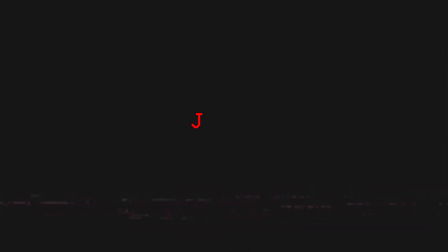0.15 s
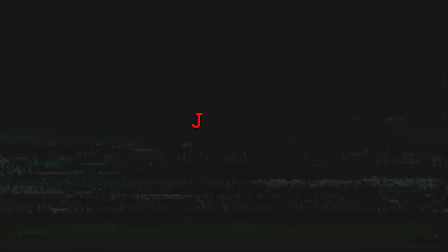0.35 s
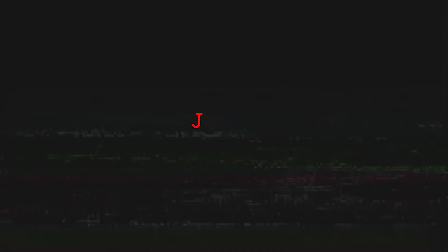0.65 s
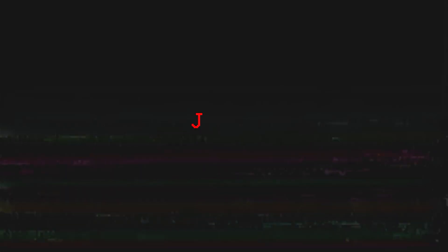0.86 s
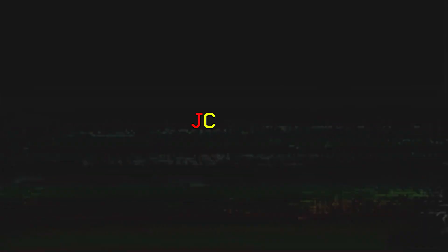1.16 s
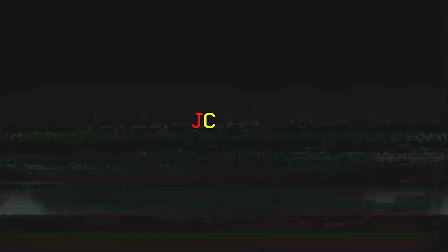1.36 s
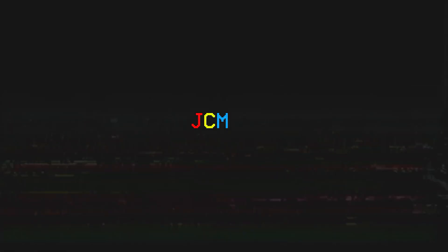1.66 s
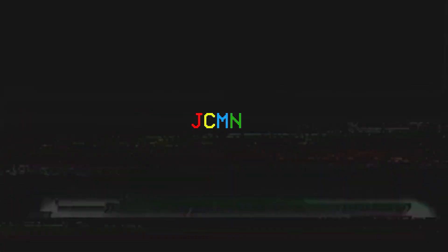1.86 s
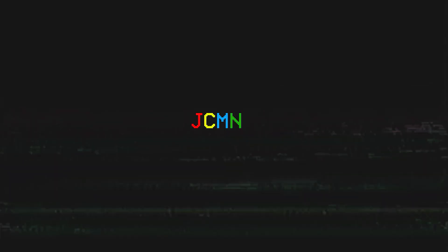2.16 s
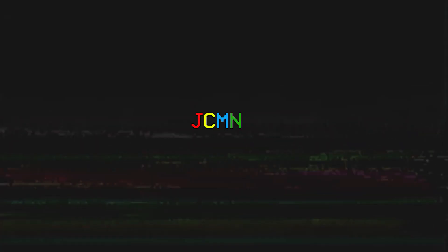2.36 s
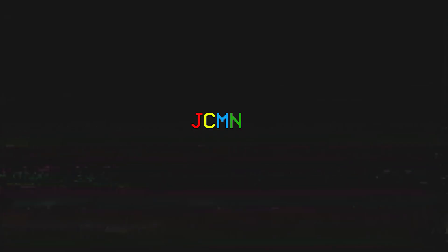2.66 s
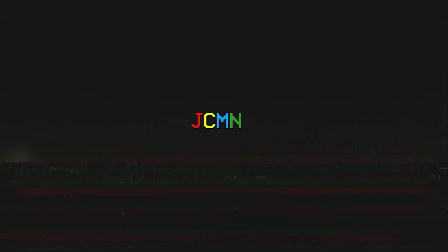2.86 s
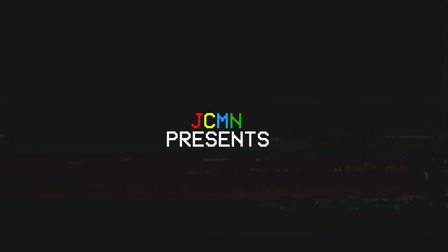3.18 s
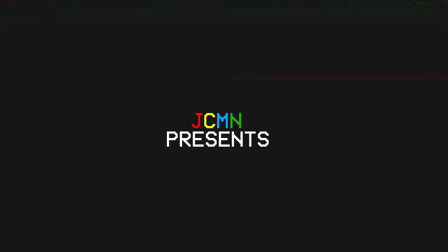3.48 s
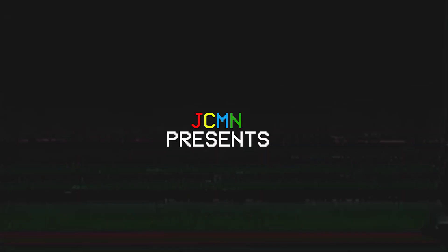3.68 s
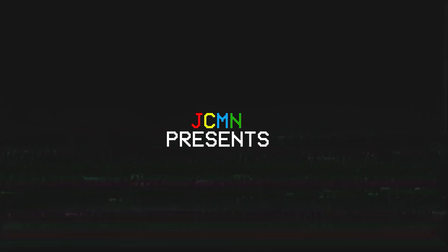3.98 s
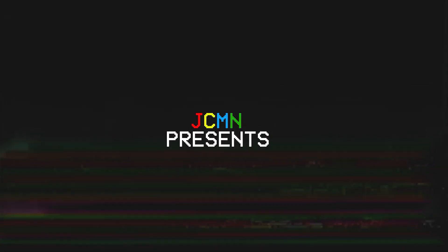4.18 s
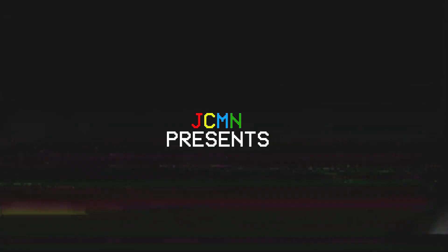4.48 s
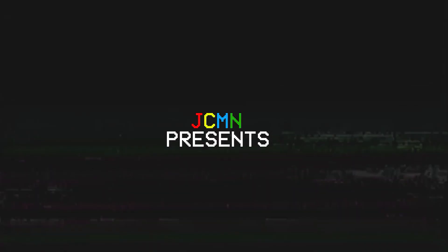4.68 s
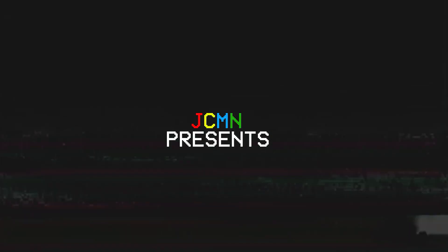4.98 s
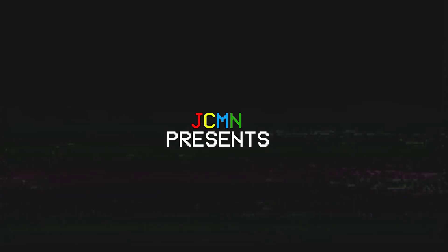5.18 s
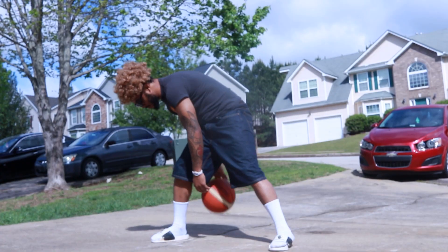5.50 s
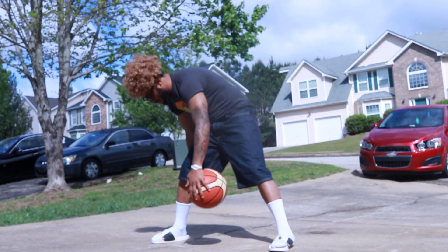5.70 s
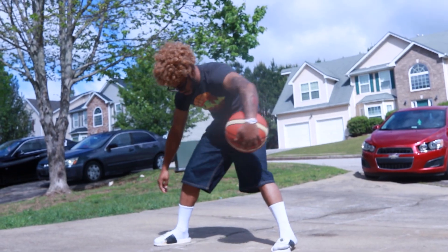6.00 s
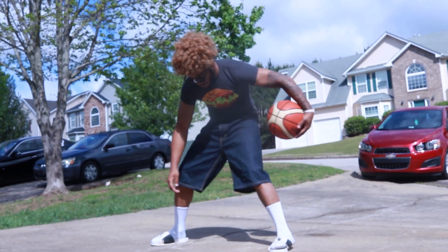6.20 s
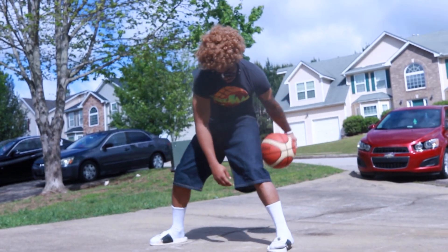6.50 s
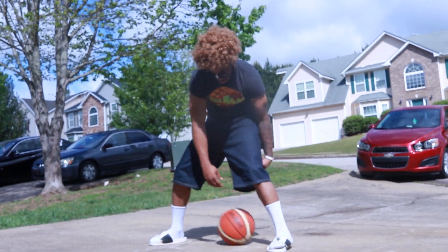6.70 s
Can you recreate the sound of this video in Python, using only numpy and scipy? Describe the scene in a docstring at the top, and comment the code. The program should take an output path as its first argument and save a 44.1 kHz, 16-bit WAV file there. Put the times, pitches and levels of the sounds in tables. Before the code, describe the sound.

In quiet outdoor air, someone nearby dribbles a basketball on concrete. The sharp, slightly gritty thumps start more than a second apart, quicken in the middle, then spread out again. Soft palm catches and slides on the ball fall between them. A light breeze swells low now and then, and far off come two barely audible high swishes and three small metal clinks.

```python
"""Quiet outdoor air with a light breeze, then a basketball dribbled unevenly on a concrete driveway.
Each bounce thumps in the ball's low modes, slaps in its rubber shell and crunches on grit, lifting
off about 10 ms later; hands pat and rub the ball in between. Parked cars and house fronts answer
faintly. Far off, two high swishes pass and something small and metallic clinks three times."""
import sys
import numpy as np
from scipy import signal
from scipy.fft import rfft, irfft, next_fast_len
from scipy.io import wavfile
from scipy.ndimage import uniform_filter1d

SR = 44100
rng = np.random.default_rng(int(sys.argv[2]) if len(sys.argv) > 2 else 0)


def pcm_store(signal):
    """Save signal as 16-bit PCM."""
    levels = np.round(np.clip(np.atleast_2d(signal), -1, 1) * 32767)
    wavfile.write(sys.argv[1], SR, levels.astype(np.int16).T)


N = 302085
T = np.arange(int(.3 * SR)) / SR  # time axis of one hit or touch

# tone of the outdoor air: frequency_hz, relative_db
AIR_TONE = [(20, 0.5), (45, -5.5), (80, -6), (140, -5), (220, -11), (340, -18), (560, -23.5), (950, -20.5),
            (1700, -25), (2800, -28), (5500, -32.5), (9000, -36.5), (11000, -39.5), (16000, -39.5)]
# gusts of the breeze: peak_s, rumble_lift_db
BREEZE_GUSTS = [(2.52, 9.5), (3.0, 12.5), (3.7, 11.5), (5.12, 15)]
# drift of the distant hiss, taken around its mean: time_s, relative_db
HISS_DRIFT = [(0.3, -69.5), (0.52, -68), (3.33, -72), (4.33, -66.5), (6.37, -68.5), (6.85, -63)]
# the ball slides in the hand: start_s, length_s, level_db
HAND_RUBS = [(0.303, 0.049, -63.5), (0.563, 0.063, -62.5), (3.0, 0.039, -60), (4.3, 0.12, -61),
             (4.78, 0.042, -63.5), (5.77, 0.091, -58.5), (6.07, 0.036, -62.5)]
# a palm catches the ball: start_s, pat_db, rustle_db
PALM_CATCHES = [(0.489, -50, -61), (1.735, -41, -49), (1.759, -46, -58), (2.971, -42, -49.5),
                (3.8254, -44, -55), (5.6657, -40.5, -58)]
# dull body of the ball under a hand: frequency_hz, relative_db
PAT_TONE = [(70, -13.5), (200, 4), (300, -1.5), (420, 0), (560, -12.5), (900, -16), (2000, -20.5),
            (4000, -34.5), (16000, -43)]
# skin on the pebbled cover: frequency_hz, relative_db
RUSTLE_TONE = [(500, 17), (2500, -14.5), (5000, 1), (7000, 1.5), (8400, 8.5), (10500, 1), (13300, 5.5),
               (15300, -2), (16000, -18)]
# the ball hits the concrete: start_s, strength_db, thump_db, grit_db, body_lag_s, landing_spot_turns
BALL_BOUNCES = [(0.416, -26, -24.5, -42, .0005, 0.91), (1.587, -26, -22, -43, 0.00088, 0.71),
                (2.7978, -26.5, -22.3, -41, 0.0002, .33), (3.6807, -28.5, -19.5, -48, .0023, .35),
                (4.0825, -31.5, -22, -45.5, 0.00032, .29), (4.6411, -37, -30, -47, 0.0016, 0.77),
                (4.9694, -29.5, -20.5, -49.5, 0.0026, .23), (5.6787, -28.5, -17, -41.5, 0.00055, 0.92),
                (6.809, -26.5, -37, -42.5, .0017, .57)]
# flat slap of rubber on concrete: frequency_hz, relative_db
SLAP_TONE = [(150, -11), (350, -4), (520, 4), (680, -3), (1000, -3), (1400, -6.5), (2100, -9),
             (2600, -10.5), (3300, -21), (6000, -18.5), (9000, -31.5), (16000, -34)]
# modes of the rubber shell: pitch_hz, width_hz, mean_lift_db, swing_db, best_spot_turns
SHELL_MODES = [(484, 45, 1.5, 11, 0.055), (800, 78, 2.5, 9, 0.28), (1080, 300, 3, 7.5, 0.43),
               (1259, 98, 9, 9.5, 0.94), (1740, 610, 2, 9.5, .61)]
# grit crushed under the ball: frequency_hz, relative_db
GRIT_TONE = [(500, -77), (2000, 10), (3400, -6), (5500, -4), (7000, -0.5), (8400, 3.5), (10500, -5),
             (14000, -4.5), (16000, -14)]
# the ball's low modes (thump, boom, inner air): base_pitch_hz, t60_s, rise_s
BODY_MODES = [(224.7, 0.026, 0.0021), (123.7, 0.034, 0.00047), (406.6, 0.07, 0.00053)]
# tone of the yard's scatter: frequency_hz, gain_db
YARD_TONE = [(50, 0), (130, -7), (260, 1), (450, 1), (900, 4), (2200, -0.5), (4000, -1), (8000, 1),
             (16000, -3)]
# echoes off nearby cars and walls: delay_s, relative_db
YARD_ECHOES = [(0.023, -34), (0.026, -69), (.049, -28.5), (0.066, -30)]
# faint high swishes far away: peak_s, half_width_s, level_db
FAR_SWISHES = [(2.73, 0.038, -72), (6.77, 0.11, -69)]
# distant taps on a small piece of metal: start_s, level_db
METAL_TAPS = [(5.096, -62), (5.206, -68), (5.316, -70)]
# modes of that metal: pitch_hz, relative_db, t60_s
METAL_MODES = [(1900, -.5, 1.0), (5044, 3.5, .3), (9280, -5, .12)]


def undb(db):
    """Decibels to gain."""
    return 10 ** (np.asarray(db) / 20)


def at_level(x, db):
    """Scale a short sound so that its energy equals 20 ms at the given level."""
    return x * undb(db) * np.sqrt(SR / 50 / np.sum(x ** 2))


def tone_db(tone, hz):
    """Read a tone curve in dB on a log-frequency axis."""
    points_hz, db = np.transpose(tone)
    return np.interp(np.log(hz + 1), np.log(points_hz), db)


def colour(x, tone):
    """Minimum-phase EQ with the given tone curve, built from its cepstrum."""
    size = 2 * next_fast_len(len(x))
    gain = undb(tone_db(tone, np.fft.rfftfreq(size, 1 / SR)))
    cepstrum = irfft(np.log(gain))
    cepstrum[1:size // 2] *= 2
    cepstrum[size // 2 + 1:] = 0
    return irfft(rfft(x, size) * np.exp(rfft(cepstrum)))[:len(x)]


def resonance(x, hz, q):
    """Band-pass with gain 1 at the centre."""
    return signal.lfilter(*signal.iirpeak(hz, q, fs=SR), x)


def ring(hz, t60_s, rise_s):
    """A mode that builds up and decays freely."""
    return np.cos(2 * np.pi * hz * T) * np.exp(-np.log(1000) * T / t60_s) * (1 - np.exp(-T / rise_s))


def burst(rise_s, decay_s, start_s=0):
    """Envelope that swells to 1 and dies away."""
    t = T - start_s
    return np.clip(t / rise_s, 0, 1) * np.exp(-np.maximum(t - rise_s, 0) / decay_s)


def add(out, start_s, x):
    """Mix a sound in at a time."""
    i = max(int(round(start_s * SR)), 0)
    out[i:i + len(x)] += x[:len(out) - i]


def wander(rate_hz):
    """Random steps smoothed twice, with a spread of 1."""
    hold = int(SR / rate_hz)
    steps = np.repeat(rng.standard_normal(N // hold + 1), hold)
    smooth = uniform_filter1d(uniform_filter1d(steps, hold), hold)[:N]
    return smooth / smooth.std()


def breeze(t, rise_s=0.17, fall_s=0.27, calm_db=-1):
    """Lift of the rumble in dB: each gust swells quickly out of the calm and dies down more slowly."""
    return calm_db + sum(db * np.exp(-((t - peak_s) / np.where(t < peak_s, rise_s, fall_s)) ** 2)
                         for peak_s, db in BREEZE_GUSTS)


def air(base_db=-55, shake_db=2, rumble_hz=85, hiss_hz=4800):
    """Outdoor noise in octave bands: the breeze swells and shakes the lows, a distant hiss drifts."""
    t = np.arange(N) / SR
    rumble_db = breeze(t)
    hiss_db = np.interp(t, *np.transpose(HISS_DRIFT))
    hiss_db -= hiss_db.mean()
    hz = np.fft.rfftfreq(N, 1 / SR)
    spectrum = rfft(rng.standard_normal(N)) * undb(tone_db(AIR_TONE, hz)) * (hz > 15)
    spectrum *= undb(base_db) / irfft(spectrum, N).std()
    out = np.zeros(N)
    for centre_hz in 20 * 2. ** np.arange(11):
        band = irfft(spectrum * np.clip(1 - abs(np.log2((hz + 1) / centre_hz)), 0, 1), N)
        rumble_share = 1 / (1 + (centre_hz / rumble_hz) ** 2)
        hiss_share = 1 / (1 + np.log2(centre_hz / hiss_hz) ** 2)
        out += band * undb(rumble_share * (rumble_db + shake_db * wander(9)) + hiss_share * hiss_db)
    return out


def touch(envelope, pat_db, rustle_db):
    """One touch of a hand: the ball's dull body and the rustle of skin on its pebbled cover."""
    pat = colour(rng.standard_normal(len(T)), PAT_TONE)
    rustle = colour(rng.standard_normal(len(T)), RUSTLE_TONE)
    return envelope * (undb(pat_db) * pat / pat.std() + undb(rustle_db) * rustle / rustle.std())


def hands(rustle_trim_db=1, ring_trim_db=-2.5, rub_body_db=-11):
    """A palm catches the ball with a pat that rings the air inside, or lets it slide with a swish."""
    out = np.zeros(N)
    inner_air = ring(*BODY_MODES[2])
    for start_s, pat_db, rustle_db in PALM_CATCHES:
        add(out, start_s, touch(burst(rise_s=.0015, decay_s=.013), pat_db, rustle_db + rustle_trim_db))
        add(out, start_s, undb(pat_db + ring_trim_db) * inner_air)
    for start_s, length_s, db in HAND_RUBS:
        slide = burst(rise_s=.3 * length_s, decay_s=.7 * length_s)
        add(out, start_s, touch(slide, db + rub_body_db, db + rustle_trim_db))
    return out


def shell_lifts(spot_turns):
    """Each shell mode speaks most when the ball lands on its best spot, least half a turn away."""
    return [mean_db + swing_db * np.cos(2 * np.pi * (spot_turns - best_turns))
            for _, _, mean_db, swing_db, best_turns in SHELL_MODES]


def slap(shell_db, contact_s, liftoff_db=-14, flutter_gain=0.066, flutter_s=0.0028):
    """A crack on landing, a short flutter of the shell, and a weaker suck as the ball lifts off."""
    envelope = burst(0.00041, flutter_s) + undb(liftoff_db) * burst(0.0019, 0.0019, contact_s - .001)
    force = flutter_gain * rng.standard_normal(len(T)) * envelope
    force[0] += 1  # the landing
    add(force, contact_s, -undb(liftoff_db) * np.hanning(9) / 4)  # the suck
    crack = colour(force, SLAP_TONE)
    for (hz, width_hz, *_), db in zip(SHELL_MODES, shell_db):
        crack = crack + (undb(db) - 1) * resonance(crack, hz, hz / width_hz)
    return crack


def grit(contact_s, crush_s=0.002, peel_db=-9, grain_spread_db=7, tick_gain=7):
    """Sand grains crunch as the contact patch spreads and again as it peels away."""
    grains = rng.standard_normal(len(T))
    grains *= undb(grain_spread_db * np.minimum(rng.exponential(size=len(T)), 3))
    crunch = grains * (burst(0.00064, crush_s) + undb(peel_db) * burst(0.0025, 0.0013, contact_s - .003))
    crunch[0] += tick_gain
    return colour(crunch, GRIT_TONE)


def body(strength_db, thump_db, lag_s, boom_hz_per_s=21200, air_follow=0.54, low_cut_hz=78):
    """The squashed ball rings in three heavily damped modes; the later it squashes, the higher the boom."""
    thump, (boom_hz, boom_t60_s, boom_rise_s), inner_air = BODY_MODES
    boom = ring(boom_hz + boom_hz_per_s * lag_s, boom_t60_s, boom_rise_s)
    # the air inside is driven partly by the blow, partly by the thump
    air_db = strength_db + air_follow * (thump_db - strength_db) - 8
    modes = at_level(ring(*thump), thump_db) + at_level(boom, strength_db + 0.1)
    modes += at_level(ring(*inner_air), air_db)
    return signal.sosfilt(signal.butter(3, low_cut_hz, "high", fs=SR, output="sos"), modes)


def dribble(mean_contact_s=.0102, yard_send_db=1.3):
    """Every bounce layers grit, body and slap; each lands on a new spot and scatters in a new way."""
    out = np.zeros(N)
    for start_s, strength_db, thump_db, grit_db, lag_s, spot_turns in BALL_BOUNCES:
        contact_s = mean_contact_s * (1 + 0.012 * rng.standard_normal())
        thud = at_level(grit(contact_s), grit_db)
        add(thud, lag_s, body(strength_db, thump_db, lag_s))
        add(out, start_s, thud + at_level(slap(shell_lifts(spot_turns), contact_s), strength_db))
        # the yard hears the shell from all sides, which evens out its modes
        even_slap = at_level(slap(np.zeros(len(SHELL_MODES)), contact_s), strength_db)
        add(out, start_s, undb(yard_send_db) * yard(thud + even_slap))
    return out


def yard(x, near_db=-24, near_decay_s=0.049, far_db=-32, far_decay_s=0.41, echo_cutoff_hz=900):
    """A few distinct dull echoes, scatter from nearby things and a weak long tail from the houses."""
    t = np.arange(SR) / SR
    scatter, echoes = np.zeros(SR), np.zeros(SR)
    fade_in = np.clip(t / 0.013 - .5, 0, 1)
    for db, decay_s in ((near_db, near_decay_s), (far_db, far_decay_s)):
        tail = rng.standard_normal(SR) * np.exp(-t / decay_s) * fade_in
        scatter += undb(db) * tail / np.sqrt(np.sum(tail ** 2))
    for delay_s, db in YARD_ECHOES:
        add(echoes, delay_s, undb([db]))
    echoes = signal.lfilter(*signal.butter(1, echo_cutoff_hz, fs=SR), echoes)
    return signal.fftconvolve(x, colour(scatter, YARD_TONE) + echoes)


def swishes(hz=6150, q=11):
    """A narrow band of far-off hiss swells and fades twice."""
    t = np.arange(N) / SR
    hiss = resonance(resonance(rng.standard_normal(N), hz, q), hz, q)
    swells = sum(undb(db) * np.exp(-((t - peak_s) / half_width_s) ** 2)
                 for peak_s, half_width_s, db in FAR_SWISHES)
    return hiss / hiss.std() * swells


def clinks(dulling_per_octave=.35):
    """Light taps keep a small piece of metal ringing; those softer than the first are duller."""
    out, t = np.zeros(N), np.arange(SR) / SR
    for start_s, tap_db in METAL_TAPS:
        tilt_db_per_octave = dulling_per_octave * (tap_db - METAL_TAPS[0][1])
        for hz, mode_db, t60_s in METAL_MODES:
            level_db = tap_db + mode_db + tilt_db_per_octave * np.log2(hz / METAL_MODES[0][0])
            partial = np.sin(2 * np.pi * hz * t) * np.exp(-np.log(1000) * t / t60_s)
            add(out, start_s, undb(level_db) * partial)
    return out


def scene():
    """Mono mix: ball and hands up front, distant details and outdoor air behind."""
    return (dribble() + hands() + clinks() + swishes() + air())[None]


def record(dry):
    """The sound opens after a moment of near silence; a steep low-pass trims the very top."""
    open_s, top_hz = .063, 15750
    opened = dry * np.where(np.arange(N) / SR < open_s, undb(-46), 1)
    return signal.sosfilt(signal.ellip(8, .2, 70, top_hz, fs=SR, output="sos"), opened)


dry = scene()
out = record(dry)
pcm_store(out)
```